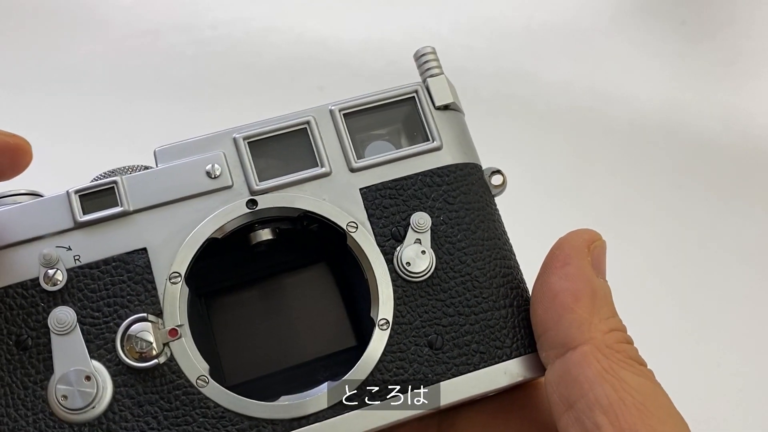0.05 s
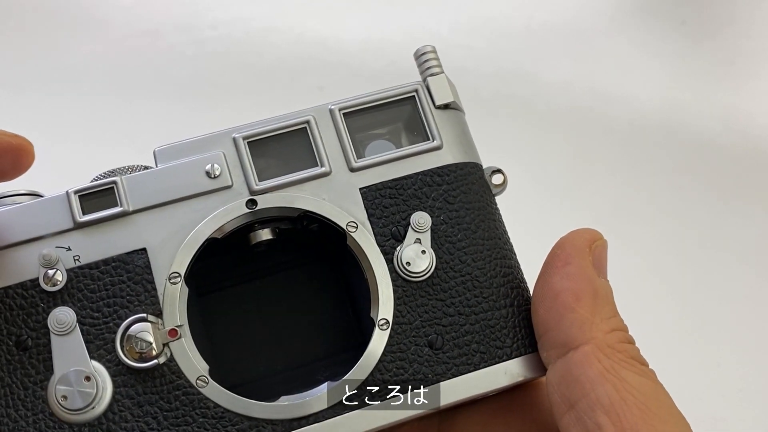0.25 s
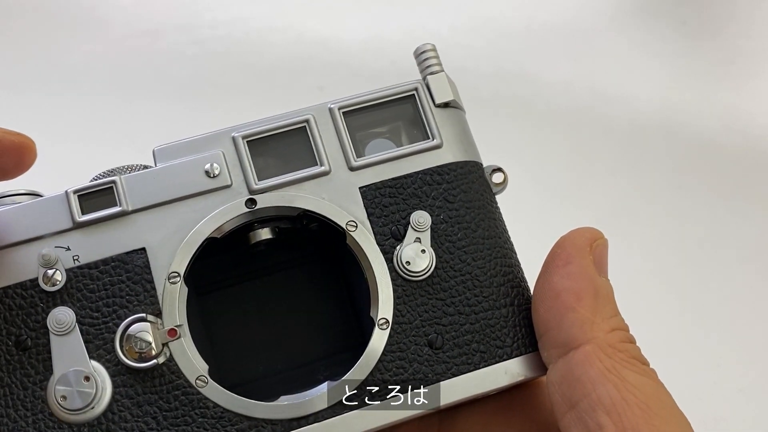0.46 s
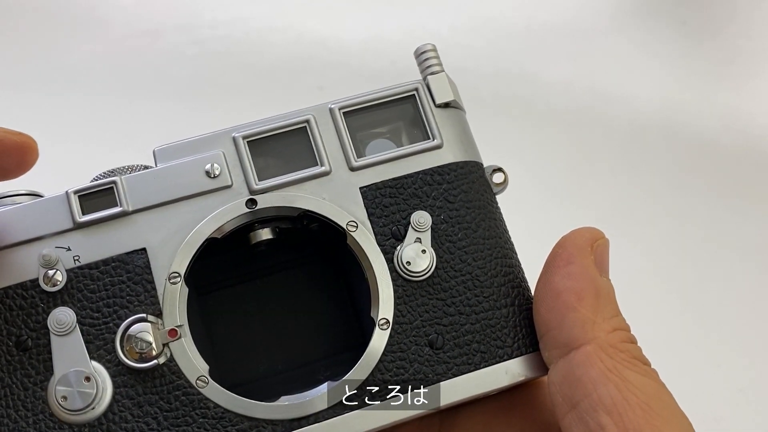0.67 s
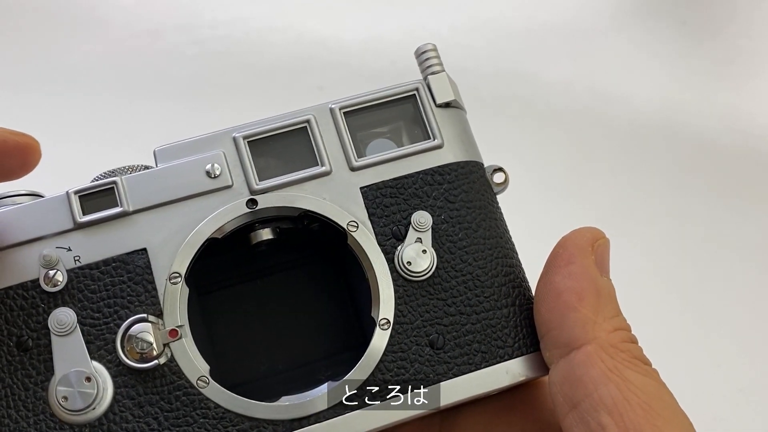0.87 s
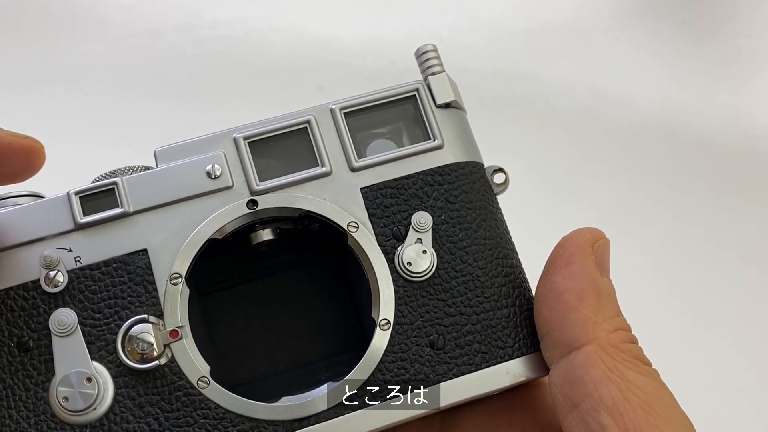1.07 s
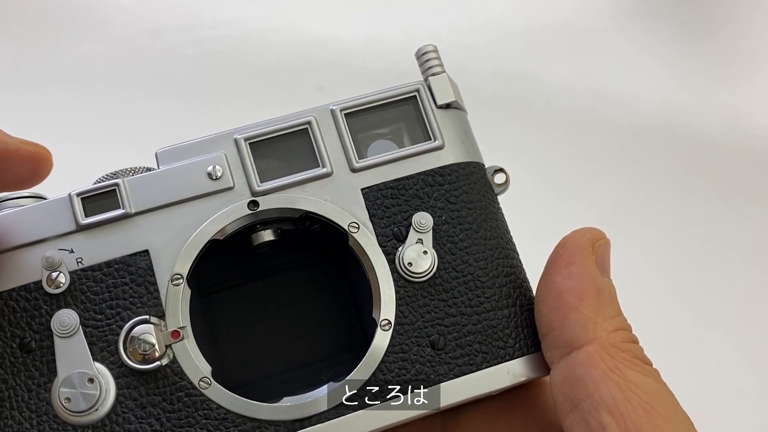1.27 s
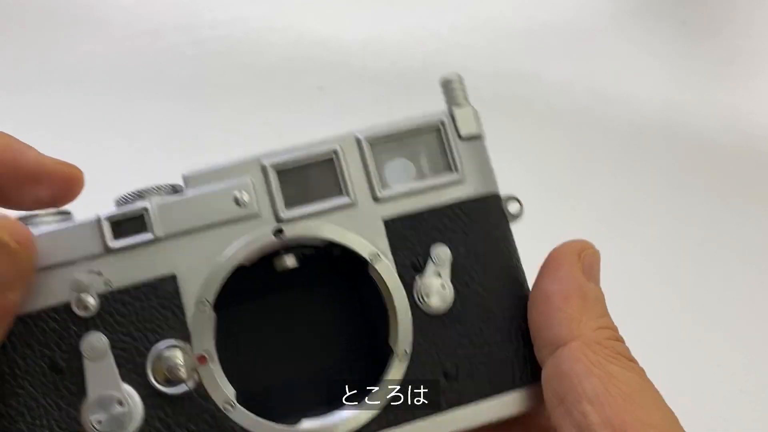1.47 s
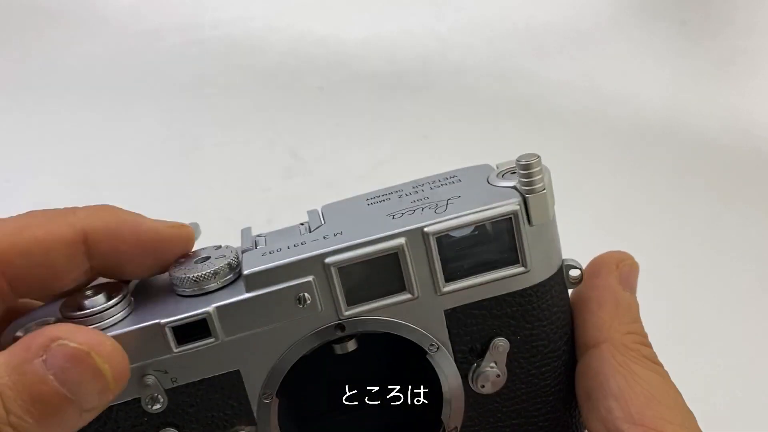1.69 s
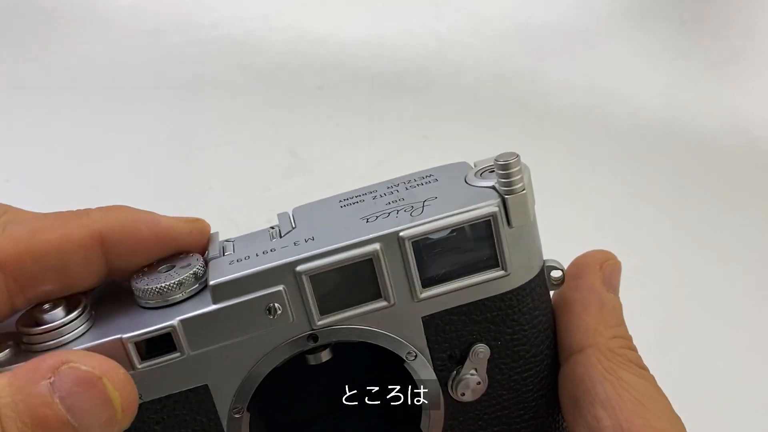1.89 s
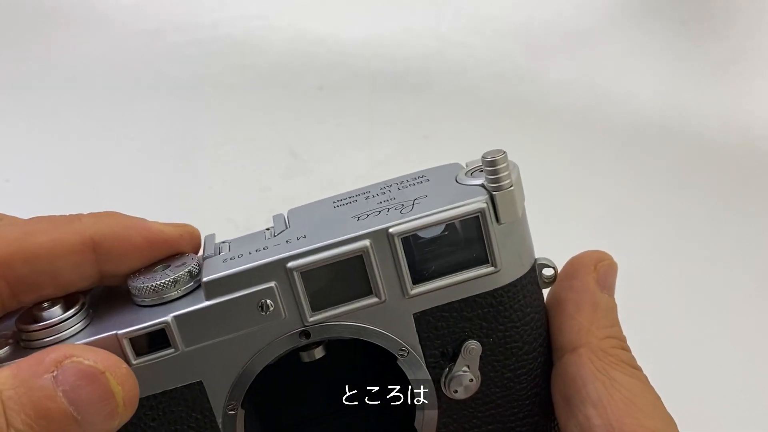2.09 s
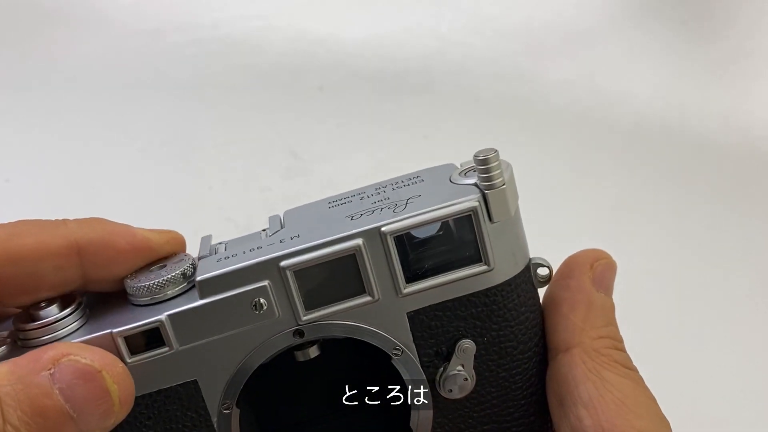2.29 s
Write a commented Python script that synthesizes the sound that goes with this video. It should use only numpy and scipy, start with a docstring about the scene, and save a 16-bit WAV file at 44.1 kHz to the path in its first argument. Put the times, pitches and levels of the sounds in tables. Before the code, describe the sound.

Sharp metallic camera shutter snap, followed by a soft clockwork buzz and small dial clicks.

```python
"""A clockwork camera shutter on a slow speed, close up in a quiet room.
The timing gears whir, the release clicks, and at 0.2 s the curtain slams shut and rings the metal body.
The escapement then ticks back for two seconds, slowing and changing tone as the camera is tipped.
Fingers shift on the body along the way, and at the end the speed dial clicks.
Mains hum, low rumble and faint hiss lie underneath throughout."""
import sys
import numpy as np
from scipy import signal
from scipy.fft import rfft, irfft
from scipy.io import wavfile

SR = 44100
rng = np.random.default_rng(int(sys.argv[2]) if len(sys.argv) > 2 else 0)


def bounce(signal):
    """Save signal as a 16-bit WAV file at the path given by the first command-line argument."""
    frames = np.transpose(np.atleast_2d(signal))
    limited = np.clip(frames, -1, 1)
    pcm = np.round(limited * 32767).astype(np.int16)
    wavfile.write(sys.argv[1], SR, pcm)


N = 108045

# The curtain hits its brake and rebounds. Each row: start in seconds, snap level in dB, thud level in dB.
CURTAIN_BLOWS = [(0.2003, -17, -30), (0.2012, -11.5, -19), (.2028, -5.5, -20.5), (0.2035, -4, -13.5),
                 (0.2065, -17.5, -30.5), (0.2085, -11, -33)]
# EQ of the slam's bright snap. Each row: frequency in Hz, relative level in dB.
SNAP_EQ = [(500, -32), (2900, -14.5), (3450, 7.5), (3800, -8.5), (4900, -8), (6800, -4), (9200, 3.5),
           (10500, 8.5), (12200, -2.5), (15000, -1), (16000, -3.5)]
# EQ of the darker thud under it. Each row: frequency in Hz, relative level in dB.
THUD_EQ = [(60, -27.5), (200, -13), (420, -13.5), (680, -6), (800, 2), (1150, -2), (1340, -21), (1600, 5),
           (2000, -4.5), (2500, 1), (3000, -12), (6000, -40)]
# EQ of the springs and plates shimmering after the slam. Each row: frequency in Hz, relative level in dB.
SHIMMER_EQ = [(200, -16.5), (850, -10.5), (1300, -19.5), (2000, -7), (2900, -2), (3400, -2.5), (3800, -3.5),
              (4800, -5), (8000, 1), (9500, 3), (10400, 7.5), (12000, -2.5), (15000, -1.5), (16000, -13.5)]
# The ring of the metal body. Each row: pitch in Hz, relative level in dB, T60 in seconds.
BODY_MODES = [(797, -10, .045), (1560, -15, .09), (3370, -10, .14), (3440, 9, .04), (3505, -12, .12),
              (3456, -4, .14), (8280, -8, .11), (9084, -6, .1), (9330, -6, .12), (10271, -3, .13),
              (10443, -2, .15), (10811, -5, .11)]
CURTAIN_DECAY_S, BODY_RING_DB = 0.0023, -24.5
SHIMMER_DB, SHIMMER_T60_S = -27.5, 0.31

# Volume envelope of the timing gears. Each row: time in seconds, level in dB.
WHIR_ENVELOPE = [(0, -39), (.07, -37.5), (.14, -37.5), (.165, -36.5), (.179, -35.5), (.184, -45),
                 (.2, -37.5), (.21, -77)]
# EQ of the timing gears. Each row: frequency in Hz, relative level in dB.
WHIR_EQ = [(200, -52), (600, -29), (820, 0), (980, -10), (1250, -6.5), (1450, 0.5), (1700, -1),
           (2600, -2.5), (3100, -3), (3480, 2), (4300, -3.5), (4560, 0.5), (4900, -2.5), (6200, -5.5),
           (8200, 5.5), (9800, 0), (10800, 3), (12500, -0.5), (14600, 4), (16000, -7.5)]
TOOTH_HZ, TOOTH_DEPTH, PALLET_DEPTH, WHIR_GRIT_DB = 255, 0.15, 0.25, 1

# Tempo of the escapement as it runs back. Each row: time in seconds, ticks per second.
TICK_TEMPO = [(.2022, 108.5), (.3225, 108.5), (.55, 103.3), (.85, 105.6), (1.0, 97.1), (1.22, 101.9),
              (1.35, 92.4), (1.5, 101), (1.62, 82.8), (1.73, 89.6), (1.85, 84.5), (2.15, 86.7)]
# Dynamics of the escapement. Each row: time in seconds, tick level in dB, gear rustle level in dB,
# strong-weak swing in dB.
TICK_DYNAMICS = [(.3, -48, -56, 2), (.42, -44, -54, 1.5), (1.48, -45.5, -55.5, -1), (1.63, -43.5, -50, 4),
                 (1.72, -42, -60.5, 2), (1.9, -40.5, -55.5, 0), (2.03, -41.5, -60, 2),
                 (2.125, -41, -57, 1.5), (2.18, -56.5, -70, -1)]
# In every tick the pallet grazes the tooth, lands and rebounds.
# Each row: delay in seconds, timing scatter in seconds, relative level in dB.
PALLET_CONTACTS = [(0, 0.000073, -4.5), (.0008, .0003, 0), (.0031, .0007, -4)]
# The ring of the escapement's plates and the shutter box. Each row: pitch in Hz, relative level
# facing forward in dB, relative level tipped in dB, T60 in seconds.
ESCAPEMENT_MODES = [(2380, -14, -13, .013), (3410, -13, -11.5, .023), (5700, -8.5, -14, .009),
                    (7250, -10, -16, .009), (8400, -10.5, -12, .014), (8790, -19, -6, .009),
                    (9330, -8, -13, .012), (10380, -10, -16, .02), (10740, -8, -15, .016),
                    (11120, -9.5, -24, .014), (12150, -11.5, -16, .016), (13780, -6, -2.5, .011),
                    (14350, -13, -3, .005)]
# EQ of the escapement through the lens mount. Each row: frequency in Hz, relative level in dB.
LENS_MOUNT_EQ = [(300, -23.5), (1300, -21.5), (1900, -6), (2600, -5.5), (4400, -7), (5900, -1), (6500, -3),
                 (9500, 1), (14600, -1.5), (16000, -14)]
# EQ of the escapement through the top plate. Each row: frequency in Hz, relative level in dB.
TOP_PLATE_EQ = [(300, -19), (1300, -12), (2400, -8.5), (4200, -6.5), (5200, 2), (8750, 3), (10200, 0),
                (14600, 0.5), (16000, -7)]
TICK_DECAY_S, TICK_JITTER_S = .002, .0002
TICK_SCATTER_DB, TICK_CHATTER_DB, TICK_RING_DB = .9, -2, .5
TIP_MIDPOINT_S, TIP_LENGTH_S = 1.56, 0.41

# The release clicks, then the dial. Each row: start in seconds, crack level in dB, crack decay in
# seconds, edge level in dB, relative knock level in dB, ping level in dB, ping pitch in Hz,
# ping T60 in seconds.
CATCH_CLICKS = [(0.1728, -35, 0.0082, -46, -37, -48, 8070, .004),
                (2.2301, -45.5, 0.0051, -54, -60, -41.5, 2100, .02),
                (2.2332, -41.5, 0.0037, -50, -57, -39, 3400, 0.011),
                (2.3174, -42.5, 0.0032, -37.5, -58, -38, 8350, .003),
                (2.3182, -49.5, 0.0018, -50, -53, -44.5, 870, 0.013),
                (2.382, -30.5, 0.0044, -45, -54, -22, 7000, 0.0074),
                (2.3827, -55, 0.0016, -54, -39, -24.5, 6020, 0.0054),
                (2.3836, -38, .003, -65, -25, -31, 7400, .006)]
# EQ of a catch's crack. Each row: frequency in Hz, relative level in dB.
CRACK_EQ = [(100, -15), (350, -12.5), (780, 7), (1200, -6), (1650, 1), (2200, 10.5), (2800, 2), (3500, 5),
            (5000, -0.5), (6000, -6), (9000, -3.5), (12000, -12.5), (14300, -13), (16000, -27.5)]
# EQ of its thin, sharp edge. Each row: frequency in Hz, relative level in dB.
EDGE_EQ = [(500, -19), (6500, -13), (7500, 4), (8900, 3.5), (10500, -8), (12500, -21), (14200, -5.5),
           (16000, -12)]
# The hollow knock of the top plate. Each row: pitch in Hz, relative level in dB, T60 in seconds.
KNOCK_MODES = [(560, -9, .011), (790, -5, .018), (1500, -2, .014), (1850, 1, .012), (2080, -19, .08),
               (2430, -6, .011), (3440, -5, .016), (3950, -6, .01)]

# Fingertips land on the body. Each row: start in seconds, level in dB.
FINGER_TAPS = [(1.49, -43.5), (1.555, -29.5)]
# Skin rubs as the grip shifts. Each row: centre in seconds, width in seconds, level in dB.
SKIN_RUBS = [(1.5, 0.021, -54), (1.6, 0.04, -57.5), (1.66, 0.012, -50.5), (1.89, 0.032, -58.5)]
# EQ of the rubbing skin. Each row: frequency in Hz, relative level in dB.
RUB_EQ = [(60, 5), (220, 2.5), (450, -2), (850, -1.5), (1200, -9.5), (1700, -1.5), (4000, -16.5),
          (12000, -16.5)]
# The palm slides on the leather cover. Each row: centre in seconds, width in seconds, level in dB.
PALM_SLIDES = [(1.14, 0.047, -60)]
# EQ of the sliding palm. Each row: frequency in Hz, relative level in dB.
SLIDE_EQ = [(70, -5), (130, -2), (300, -4), (600, -23), (2000, -42)]
# Dull bumps of the hands. Each row: centre in seconds, level in dB, pitch in Hz.
GRIP_BUMPS = [(1.629, -36.5, 15), (2.236, -38.5, 47.6), (2.237, -43, 88.5), (2.411, -44, 34)]
TAP_HZ, TAP_ATTACK_S, BUMP_WIDTH_S = 755, 0.0012, .013

# Mains hum and its harmonics. Each row: pitch in Hz, RMS level in dB.
MAINS_HUM = [(60, -53.5), (120, -74), (180, -73)]
# EQ of the bed of rumble and hiss. Each row: frequency in Hz, relative level in dB.
AIR_EQ = [(15, 2), (35, -1.5), (80, -15), (140, -23.5), (250, -23), (450, -28.5), (1200, -33), (4000, -39),
          (10000, -37.5), (16000, -41.5)]
AIR_DB = -52.5
ROOM_T60_S, ROOM_DB, ROOM_PREDELAY_S = 0.33, -11, 0.0055
ROOM_TREBLE_T60_S, ROOM_TREBLE_DB, ROOM_CROSSOVER_HZ = .2, -20, 4000
PEAK_LIMIT, HIGH_CUT_HZ = .8, 15800


def curtain(t):
    """The curtain slams home in quick blows; the hardest rings the body and sets springs shimmering."""
    times, snap_db, thud_db = np.array(CURTAIN_BLOWS).T
    snap = eq(chatter(blows(times, amp(snap_db)), CURTAIN_DECAY_S), SNAP_EQ)
    thud = eq(chatter(blows(times, amp(thud_db)), CURTAIN_DECAY_S), THUD_EQ)
    slam_s = times[np.argmax(snap_db)]
    fade = (t > slam_s) * decay(np.abs(t - slam_s), SHIMMER_T60_S)
    shimmer = amp(SHIMMER_DB) * eq(fade * rng.standard_normal(N), SHIMMER_EQ)
    body = ring(blows([slam_s], [amp(BODY_RING_DB)]), modes(BODY_MODES))
    return snap + thud + shimmer + body


def escapement(t):
    """Ticks ring the plates over rustling gears; the tone crossfades as the camera is tipped."""
    running = (t > TICK_TEMPO[0][0]) & (t < TICK_DYNAMICS[-1][0])
    hits = pallet_hits(t, running)
    rustle = amp(curve(t, TICK_DYNAMICS, column=2)) * running * rng.standard_normal(N)
    rattle = amp(TICK_CHATTER_DB) * chatter(hits, TICK_DECAY_S) + rustle
    tipped = np.clip((t - TIP_MIDPOINT_S) / TIP_LENGTH_S + .5, 0, 1)
    forward = 1 - tipped
    hz, forward_db, tipped_db, t60 = np.array(ESCAPEMENT_MODES).T
    plates = ring(hits * forward, modes(zip(hz, forward_db, t60)))
    plates += ring(hits * tipped, modes(zip(hz, tipped_db, t60)))
    through_case = eq(rattle * forward, LENS_MOUNT_EQ) + eq(rattle * tipped, TOP_PLATE_EQ)
    return through_case + amp(TICK_RING_DB) * plates


def pallet_hits(t, running):
    """The pallet rocks to and fro in a strong-weak beat, touching the tooth three times a tick."""
    tick_count = np.cumsum(curve(t, TICK_TEMPO) * running) / SR
    times = t[1:][np.diff(np.floor(tick_count)) > 0]
    jitter, force, *slips = rng.standard_normal((len(times), 2 + len(PALLET_CONTACTS))).T
    swing_db = curve(times, TICK_DYNAMICS, column=3) * (-1) ** np.arange(len(times))
    tick_db = curve(times, TICK_DYNAMICS) + TICK_SCATTER_DB * force + swing_db
    starts = times + TICK_JITTER_S * jitter
    return sum(blows(starts + delay + scatter * slip, amp(tick_db + db))
               for (delay, scatter, db), slip in zip(PALLET_CONTACTS, slips))


def gear_whir(t):
    """Fast gear teeth rattle while the curtain is held back."""
    phase = 2 * np.pi * TOOTH_HZ * t
    teeth = 1 + TOOTH_DEPTH * np.cos(phase) + PALLET_DEPTH * np.cos(phase / 2)
    grains = np.repeat(rng.standard_normal(N // 20 + 1), 20)[:N]  # a new level every 20 samples
    grit = amp(WHIR_GRIT_DB * grains)
    grit /= np.sqrt(np.mean(grit ** 2))
    envelope = amp(curve(t, WHIR_ENVELOPE)) * (t < WHIR_ENVELOPE[-1][0])
    return eq(rng.standard_normal(N) * teeth * grit, WHIR_EQ) * envelope


def catch_clicks():
    """Small catches snap: a crack with a sharp edge, a brief ping and a knock of the top plate."""
    crack, edge, tone = np.zeros((3, N))
    for start, crack_db, decay_s, edge_db, knock_db, ping_db, hz, t60 in CATCH_CLICKS:
        hit = blows([start], [1])
        crack += amp(crack_db) * chatter(hit, decay_s)
        edge += amp(edge_db) * chatter(hit, decay_s / 2)
        ping = modes([(hz, ping_db, t60)])
        knock = amp(knock_db) * modes(KNOCK_MODES) / 2
        tone += ring(hit, ping + knock)
    return eq(crack, CRACK_EQ) + eq(edge, EDGE_EQ) + tone


def hands(t):
    """Skin rubs, the palm slides, fingertips tap and the camera bumps in the grip."""
    handling = eq(swells(t, SKIN_RUBS), RUB_EQ) + eq(swells(t, PALM_SLIDES), SLIDE_EQ)
    for start, db in FINGER_TAPS:
        age = np.maximum(t - start, 0)
        envelope = age / TAP_ATTACK_S * np.exp(.5) * bell_curve(age, TAP_ATTACK_S)  # peaks at 1
        handling -= amp(db) * np.sin(2 * np.pi * TAP_HZ * age) * envelope
    for centre, db, hz in GRIP_BUMPS:
        handling += amp(db) * np.sin(2 * np.pi * hz * (t - centre)) * bell_curve(t - centre, BUMP_WIDTH_S)
    return handling


def room(x):
    """A small room adds a short reverb whose treble dies sooner than its middle."""
    t = np.arange(SR // 2) / SR
    response = 0
    for band, db, t60 in ("low", ROOM_DB, ROOM_T60_S), ("high", ROOM_TREBLE_DB, ROOM_TREBLE_T60_S):
        crossover = signal.butter(4, ROOM_CROSSOVER_HZ, band, fs=SR, output="sos")
        wash = signal.sosfilt(crossover, rng.standard_normal(len(t)))
        tail = decay(t, t60) * np.sqrt(2 * np.log(1000) / (t60 * SR))  # same energy at any T60
        response += amp(db) * wash * tail * (t > ROOM_PREDELAY_S)
    return x + ring(x, response)


def room_tone(t):
    """A steady bed of mains hum, low rumble and faint hiss."""
    hum = sum(np.sqrt(2) * amp(db) * np.sin(2 * np.pi * (hz * t + rng.random())) for hz, db in MAINS_HUM)
    return hum + amp(AIR_DB) * eq(rng.standard_normal(N), AIR_EQ)


def blows(times, gains):
    """Impulses at the given moments."""
    return np.bincount(np.clip(np.asarray(times) * SR, 0, N - 1).astype(int), gains, N)


def chatter(hits, decay_s):
    """A burst of fine metal chatter dying away after each blow."""
    feedback = np.exp(-2 / (decay_s * SR))
    power = signal.lfilter([1], [1, -feedback], hits ** 2 + np.finfo(np.float32).tiny)
    return np.sqrt(power) * rng.standard_normal(N)


def modes(rows):
    """The ring of a struck part: decaying partials of alternating polarity."""
    t = np.arange(SR // 2) / SR
    return sum(amp(db) * np.cos(2 * np.pi * hz * t) * decay(t, t60) * (-1) ** k
               for k, (hz, db, t60) in enumerate(rows))


def swells(t, rows):
    """Noise that swells and fades once for each row."""
    envelope = sum(amp(db) * bell_curve(t - centre, width) for centre, width, db in rows)
    return rng.standard_normal(N) * envelope


def eq(x, points, size=8192):
    """Shape the tone with an EQ curve of unit power gain."""
    hz, db = np.array(points).T
    bins_hz = np.maximum(np.fft.rfftfreq(size, 1 / SR), 1)
    gains = amp(np.interp(np.log(bins_hz), np.log(hz), db))
    cepstrum = irfft(np.log(gains))
    # Minimum phase keeps attacks crisp: nothing rings ahead of a hit.
    cepstrum[1:size // 2] *= 2
    cepstrum[size // 2 + 1:] = 0
    response = irfft(np.exp(rfft(cepstrum)))
    return ring(x, response / np.linalg.norm(response))


def ring(x, response):
    """Play a sound through an impulse response."""
    return signal.fftconvolve(x, response)[:N]


def decay(t, t60):
    """A fade that falls 60 dB in t60 seconds."""
    return np.exp(-np.log(1000) * t / t60)


def bell_curve(t, width):
    """A smooth rise and fall around time zero."""
    return np.exp(-.5 * (t / width) ** 2)


def curve(t, rows, column=1):
    """An automation line through one column of a table."""
    rows = np.array(rows)
    return np.interp(t, rows[:, 0], rows[:, column])


def amp(db):
    """Decibels to gain."""
    return 10 ** (np.asarray(db) / 20)


def scene():
    """The camera and the hands in the room, over the room tone, in mono."""
    t = np.arange(N) / SR
    camera = gear_whir(t) + curtain(t) + escapement(t) + catch_clicks()
    return (room(camera + hands(t)) + room_tone(t))[None]


def record(dry):
    """Soft clipping rounds the loudest peak, and a steep high cut trims the top."""
    rounded = PEAK_LIMIT * np.tanh(dry / PEAK_LIMIT)
    high_cut = signal.ellip(10, .1, 80, HIGH_CUT_HZ, fs=SR, output="sos")
    return signal.sosfilt(high_cut, rounded)


dry = scene()
out = record(dry)
bounce(out)
```